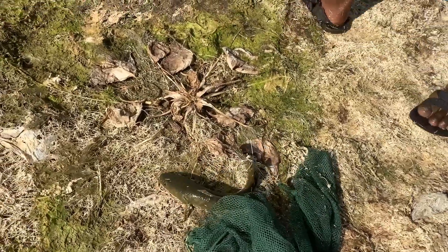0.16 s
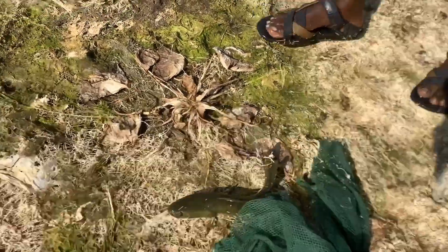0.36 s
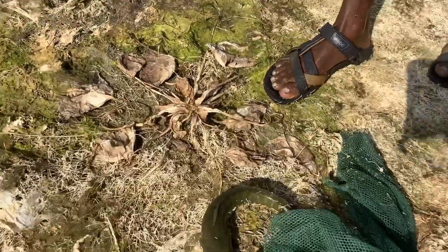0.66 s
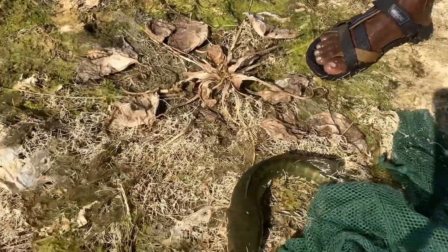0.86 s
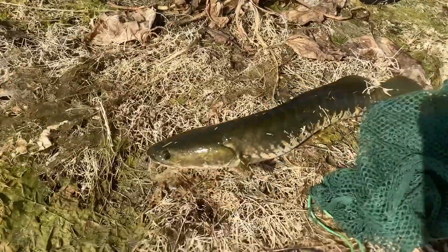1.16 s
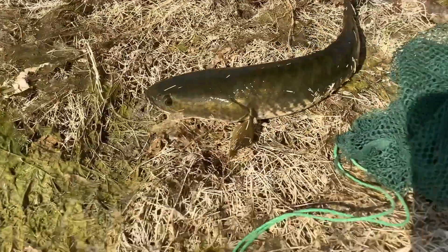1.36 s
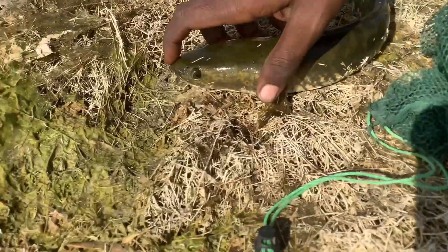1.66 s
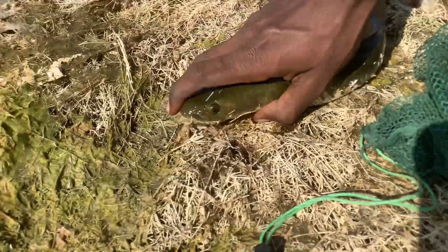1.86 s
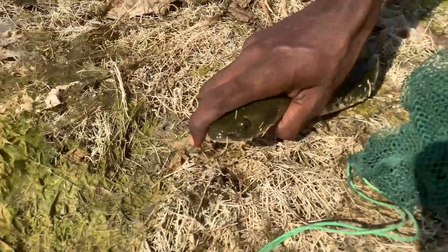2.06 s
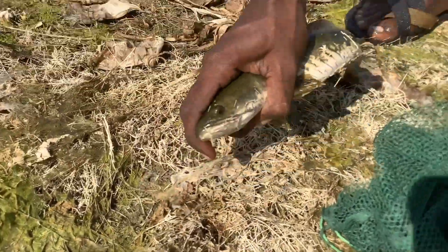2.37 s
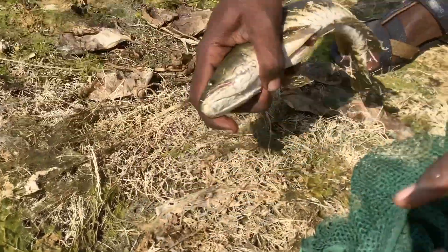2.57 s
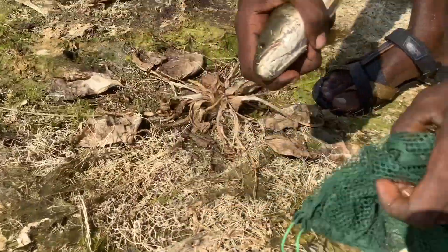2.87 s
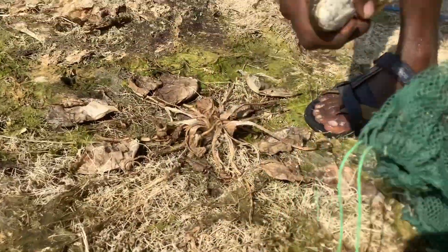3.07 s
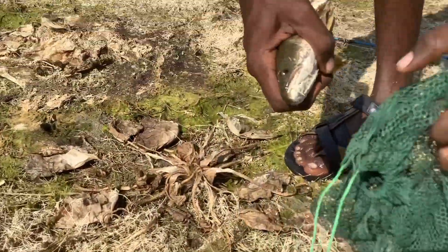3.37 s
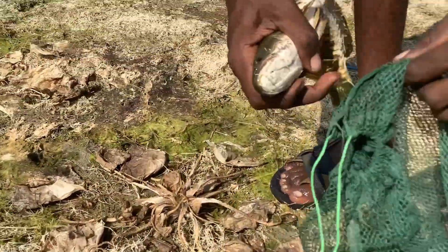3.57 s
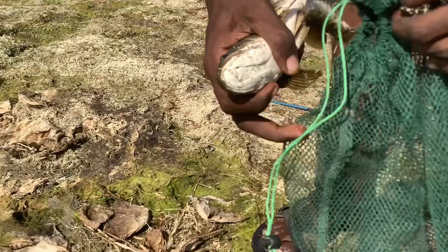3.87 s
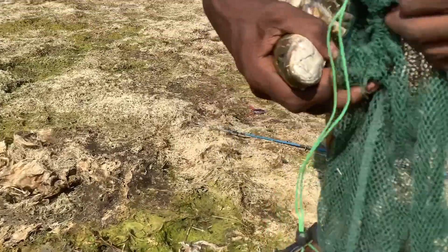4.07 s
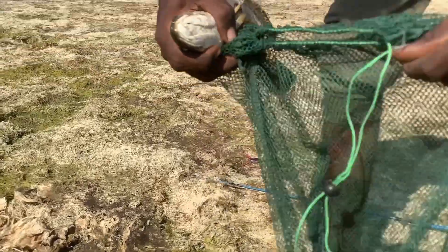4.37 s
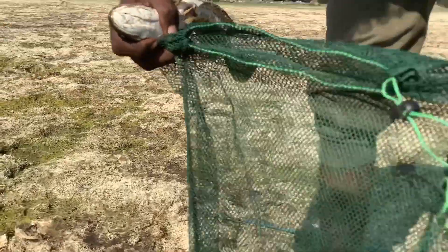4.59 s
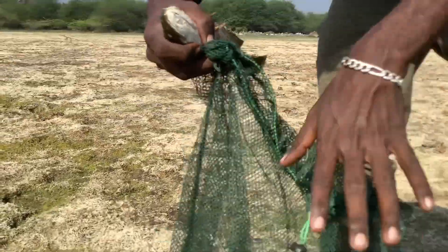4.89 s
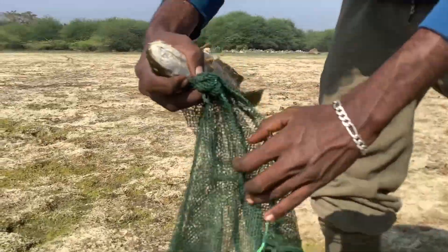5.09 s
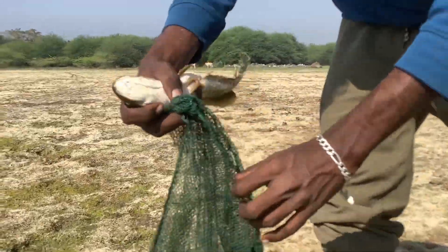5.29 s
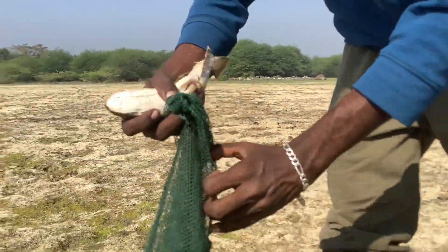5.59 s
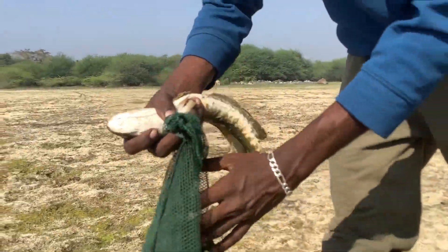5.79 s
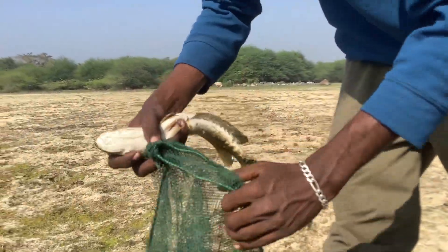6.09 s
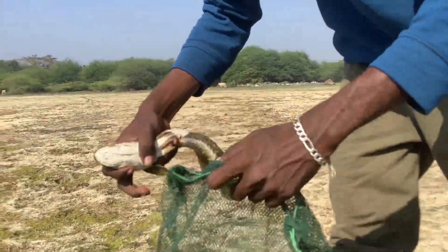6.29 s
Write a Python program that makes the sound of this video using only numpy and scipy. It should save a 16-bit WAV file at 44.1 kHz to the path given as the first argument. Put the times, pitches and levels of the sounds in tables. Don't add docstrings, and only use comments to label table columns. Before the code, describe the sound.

Close wet slaps and low thumps give way to brittle straw crunches, faint bird whistles and dry mesh scrapes, with a distant cricket and light wind.

```python
import sys
import numpy as np
from scipy import signal
from scipy.fft import rfft, irfft, next_fast_len
from scipy.io import wavfile
from scipy.ndimage import uniform_filter1d, map_coordinates

SR = 44100
rng = np.random.default_rng(int(sys.argv[2]) if len(sys.argv) > 2 else 0)


def wav_record(signal):
    frames = np.transpose(np.atleast_2d(signal))
    bounded = np.clip(frames, -1, 1)
    quanta = np.round(bounded * 32767).astype(np.int16)
    wavfile.write(sys.argv[1], SR, quanta)


def voltage_ratio(decibels):
    exponent = np.asarray(decibels, float) / 20
    return 10 ** exponent


N = 284268


def unit(x):
    return x / np.sqrt(np.mean(x ** 2) + 1e-20)


def curves(rows, edge_s=None):
    knots_s, *columns = np.transpose(rows)
    t = np.arange(N) / SR
    fall_db = 0
    if edge_s is not None:
        fall_db = -60 * np.maximum(0, np.maximum(knots_s[0] - t, t - knots_s[-1])) / edge_s
    return [np.interp(t, knots_s, column) for column in columns], fall_db


def wobble(knots_per_s):
    knots = rng.standard_normal(int(N * knots_per_s / SR) + 4)
    return map_coordinates(knots, [np.arange(N) * knots_per_s / SR])


def filtered(x, response):
    size = next_fast_len(N + SR // 4)
    return irfft(rfft(x, size) * response(np.fft.rfftfreq(size, 1 / SR)), size)[..., :N]


def coloured(x, spectrum):
    knots_hz, knots_db = np.transpose(spectrum)
    return unit(filtered(x, lambda hz: voltage_ratio(np.interp(np.log(hz + 1), np.log(knots_hz), knots_db))))


def patchy(x, depth_db):
    z = signal.stft(x, nperseg=256)[2]
    gain = uniform_filter1d(rng.standard_normal(z.shape), size=14, axis=0)
    gain = uniform_filter1d(gain, size=4, axis=1)
    return unit(signal.istft(z * voltage_ratio(depth_db * unit(gain)), nperseg=256)[1][:N])


def crackle(breaks_per_s, spread_db, smooth):
    size_db = spread_db * np.minimum(rng.exponential(size=N), 4)
    breaks = (rng.random(N) < breaks_per_s / SR) * voltage_ratio(size_db) * rng.standard_normal(N)
    return unit(breaks) + smooth * rng.standard_normal(N)


def add(x, start_s, sound):
    part = x[max(round(start_s * SR), 0):][:len(sound)]
    part += sound[:len(part)]


def ring(hz, t60_s, rise_s=.0001):
    t = np.arange(SR // 10) / SR
    return voltage_ratio(-60 * t / max(t60_s, .001)) * (1 - np.exp(-t / rise_s)) * np.sin(2 * np.pi * hz * t)


# start in seconds, crack in dB, thump in dB, knock in dB, thump in Hz.
SLAPS = [(0.3016, -55.5, -26.5, -54, 372), (0.331, -26, -20, -33, 218), (0.419, -3, -12, -15, 430),
         (0.4282, -14.5, -13.5, -32.5, 203.4), (0.4294, -17.5, -24, -35, 326), (1.276, -47, -49, -38, 211),
         (1.386, -30, -52.5, -31.5, 200), (3.686, -22.5, -46.5, -50.5, 370), (3.7132, -32, -32, -35.5, 331),
         (3.871, -19, -38.5, -30.5, 480), (3.8831, -9.5, -20, -24, 425), (3.8856, -22.5, -26, -36, 496),
         (3.962, -31, -33, -36.5, 348), (4.834, -38, -30.5, -41, 323), (5.012, -25, -25.5, -20.5, 258),
         (5.1454, -50, -34, -47, 264), (5.162, -37, -29.5, -42, 242), (5.5447, -41.5, -35, -40.5, 353),
         (5.9, -39.5, -31, -36, 350), (6.1695, -43, -35, -40.5, 193), (.531, -65, -40.5, -62, 249),
         (0.544, -65, -39.5, -58, 250), (.352, -50, -23.5, -40, 305), (.394, -56, -33, -48, 477),
         (0.318, -55, -30, -50, 420)]


def slaps():
    out, cracks = np.zeros(N), np.zeros(N)
    t = np.arange(SR // 10) / SR
    spray = (voltage_ratio(-60 * t / .005) + .07 * voltage_ratio(-60 * t / .02)) * (1 - np.exp(-t / .0005))
    for s, crack_db, thump_db, knock_db, hz in SLAPS:
        burst = spray * rng.standard_normal(len(t))
        burst /= np.linalg.norm(burst)
        add(cracks, s, voltage_ratio(crack_db) * burst)
        add(cracks, s - .002, voltage_ratio(crack_db - 16) * burst[:SR // 500][::-1])
        crack_hz = 6300 + 75 * crack_db
        add(out, s + .0006, voltage_ratio(crack_db + 6) * ring(crack_hz, .0022))
        thump = ring(hz, .03, rise_s=.001) + 1.25 * ring(hz * 1.41, .013) + .22 * ring(hz * 2.2, .019)
        add(out, s, voltage_ratio(thump_db + 2) * thump)
        knock = ring(hz * 3.18, .007) + ring(1117, .0062) + .47 * ring(1935, .0065)
        add(out, s, voltage_ratio(knock_db + 3.5) * knock)

    def skin(hz):
        resonance = 1j * hz * 7000 / (5500 ** 2 - hz * hz + 1j * hz * 7000)
        return resonance / (1 + 1j * hz / 9000) ** 2
    return out + voltage_ratio(15) * filtered(cracks, skin)


# start in seconds, length in seconds, hiss in dB,
# drag over hiss in dB, swell from start to end in dB.
STRAW_DRAGS = [(0, 0.071, -68, 13, 1), (0.123, 0.022, -57, 9.5, -10), (3.273, 0.015, -65, -17, 4),
               (4.624, 0.075, -65.5, -17, 6), (0.233, 0.059, -56.5, 9.5, 5),
               (0.303, 0.076, -45.5, 16, -0.5), (0.396, 0.032, -47, 21, 2), (0.861, 0.0087, -51, 1, 2),
               (1.323, 0.097, -53, -7.5, -7), (1.419, 0.11, -57.5, -3.5, -3.5),
               (1.916, 0.018, -56.5, -21, 7), (2.546, 0.054, -59.5, -5, -1), (2.725, 0.023, -57, -23, -0.5),
               (2.96, 0.049, -57.5, -6, -7), (4.725, 0.12, -54.5, -20, 1), (4.86, 0.05, -58, -23, 9),
               (6.192, 0.096, -63, 5.5, 2), (6.348, 0.032, -55, -3, 4), (6.39, 0.065, -57.5, -4.5, 5),
               (0.707, 0.11, -58, 3.5, -2)]
MESH_DRAGS = [(0.55, 0.02, -46.5, -14, 10.5), (0.577, 0.021, -49.5, -5.5, -4),
              (0.626, 0.062, -55.5, -3.5, 1), (5.014, 0.035, -41.5, -1.5, -5.5),
              (5.196, 0.023, -53.5, 4.5, -2), (5.36, 0.031, -46.5, -3, -1.5),
              (5.407, 0.027, -51.5, -1.5, 12), (5.446, 0.048, -38, 0, 4.5), (5.495, 0.019, -32.5, 4, 7.5)]
# frequency in Hz, level in dB per Hz.
STRAW = [(880, -28), (1500, -3.5), (1920, -7), (2320, -8), (3520, -2.5), (5440, 0.5), (6500, -4.5),
         (10800, -5), (16000, -18.5)]
MESH = [(880, -42), (1500, -18), (2460, -2), (3030, -7.5), (3480, -0.5), (6240, -4), (7240, -3.5),
        (14500, -21.5), (16000, -30.5)]
BODY = [(130, -3), (200, 2.5), (330, 0.5), (480, -1), (700, -7), (1100, -8.5), (2000, -13), (3300, -22),
        (5000, -28.5)]
MESH_BODY = [(130, -17.5), (200, 0.5), (260, -11.5), (330, -2), (480, -2), (1100, -9.5), (2000, -12.5),
             (5000, -41)]


def scrapes():
    catches = wobble(70)
    straw = coloured(crackle(1500, spread_db=1, smooth=1), STRAW)
    straw = patchy(voltage_ratio(1.9 * catches) * straw, depth_db=2.5)
    mesh = coloured(crackle(4000, spread_db=2.2, smooth=1.2), MESH)
    mesh = unit(voltage_ratio(1.5 * catches) * mesh)
    grains = crackle(900, spread_db=2.5, smooth=1.3)
    drags = [unit(voltage_ratio(1.5 * catches) * coloured(grains, body)) for body in (BODY, MESH_BODY)]
    out = np.zeros(N)
    for hiss, drag, strokes in zip((straw, mesh), drags, (STRAW_DRAGS, MESH_DRAGS)):
        for s, length_s, db, drag_db, swell_db in strokes:
            ends = [(s, db - swell_db / 2), (s + length_s, db + swell_db / 2)]
            (press_db,), fall_db = curves(ends, edge_s=.029)
            out += voltage_ratio(press_db + fall_db) * (hiss + voltage_ratio(drag_db - 2.5) * drag)
    return out


# time in seconds, level in dB.
RUSTLE = [(0, -59), (.13, -50.5), (.2, -54.5), (.45, -51.5), (.79, -52.5), (.95, -53), (1.17, -52.5),
          (1.49, -64), (1.75, -57), (2.2, -63), (2.45, -58), (2.65, -62), (3.07, -60.5), (3.3, -65.5),
          (3.72, -60.5), (4.16, -63), (5.4, -58.5), (5.7, -64)]


def rustle():
    (straw_db,), _ = curves(RUSTLE)
    stem_db = .88 * straw_db - 6.5
    clumps = wobble(30)
    stalks = coloured(crackle(400, spread_db=2.2, smooth=2.2), STRAW)
    stalks = voltage_ratio(1.8 * clumps) * patchy(stalks, depth_db=2.2)
    stems = coloured(crackle(300, spread_db=2.2, smooth=2.2), BODY)
    return voltage_ratio(straw_db - 6.5) * stalks + voltage_ratio(stem_db - 6 + 2.9 * clumps) * stems


# start in seconds, peak in dB, pitch in Hz.
TICKS = [(0.2316, -32.5, 3940), (0.3665, -21.5, 4930), (0.5115, -28.5, 4840), (0.8583, -31, 8310),
         (0.867, -34, 7760), (0.9428, -30.5, 4700), (0.9584, -30, 3640), (1.0944, -48, 7920),
         (1.4535, -32, 4830), (2.5105, -36.5, 5320), (2.7369, -35, 5020), (2.844, -37, 5440),
         (2.8786, -28, 5570), (2.879, -26.5, 10200), (2.9637, -34.5, 4530), (2.9878, -30, 3810),
         (3.209, -44.5, 7130), (3.2288, -39, 4830), (3.8454, -42, 5330), (4.88, -33, 8200),
         (4.8965, -29, 8700), (5.1926, -29, 5670), (5.215, -34, 5260), (5.3317, -32.5, 5860),
         (6.2245, -34.5, 5800)]
# start in seconds, peak in dB.
KNOCKS = [(.235, -35), (.78, -41), (.273, -47), (1.04, -44), (1.051, -51), (1.059, -42), (2.876, -46),
          (2.987, -44.5), (1.355, -39), (2.197, -42.5), (2.561, -43), (2.743, -43.5), (3.04, -37),
          (5.196, -47)]
# start in seconds, first gap in seconds, next gap over it (ratio),
# peak in dB, change in dB a stem.
RATCHETS = [(.805, .0222, .945, -32, .1), (.947, .0146, .89, -30.5, -1.6)]


def snaps():
    out = np.zeros(N)
    (stir_db,), _ = curves(RUSTLE)
    chance = rng.random((round(12 * N / SR), 3))
    strays = [(u * N / SR, stir_db[int(u * N)] + 5 + 8 * v, 3000 * 5.1 ** w) for u, v, w in chance]
    for s, db, hz in TICKS + strays:
        tick = ring(hz, .0022, rise_s=.00013) + .39 * ring(hz * .673, .0015, rise_s=.00013)
        tick += 1.3 * ring(min(hz * 1.5, 14000), .001, rise_s=.00017)
        add(out, s, voltage_ratio(db + 4.5) * tick)
    runs = []
    for (s, gap_s, shrink, db, step_db), stems in zip(RATCHETS, (6, 9)):
        for k in range(stems):
            runs.append((s + gap_s * (1 - shrink ** k) / (1 - shrink), db + k * step_db))
    for s, db in KNOCKS + runs:
        level = voltage_ratio(db + rng.normal(0, 2))
        knock = ring(rng.uniform(720, 1000), .006) + .2 * ring(520, .007)
        knock += .8 * ring(rng.uniform(1300, 2000), .0025) + .5 * ring(2800, .002)
        add(out, s, level * knock)
    return out


# start in seconds, peak in dB, pitch
# in Hz.
STALKS = [(1.3286, -26, 9800), (1.3302, -36, 5200), (1.3787, -31, 8800), (1.455, -33, 4360),
          (1.476, -29.5, 10680), (1.5313, -55, 4540), (1.5322, -34.5, 4310),
          (4.6208, -50, 8400), (4.6303, -51, 4470), (4.6612, -43, 5200), (4.725, -53, 4680),
        (4.751, -31, 9640), (4.7934, -37, 5000), (4.8248, -41, 7820), (4.8323, -38, 4600),
        (4.8792, -39, 8540), (4.8957, -30.5, 9040),
          (0.6457, -36, 5030), (3.5663, -50, 5000), (5.5788, -44, 4600), (5.5905, -42, 4350),
         (5.625, -46, 7700), (6.3173, -41.5, 7600), (6.333, -43, 7740), (6.3594, -44, 7600),
         (6.3744, -48, 7250), (6.4056, -36, 11000)]


def crush():
    out, t = np.zeros(N), np.arange(SR // 100) / SR
    for s, db, hz in STALKS:
        puff = unit(uniform_filter1d(rng.standard_normal(len(t)), size=5))
        envelope = voltage_ratio(db - .5 - 60 * t / .011) * (1 - np.exp(-t / .0006))
        add(out, s, envelope * puff * np.sin(2 * np.pi * hz * t))
    return out


def whistle(start_s, end_s, first_hz, middle_hz, last_hz, db, waver=.0146):
    u = np.linspace(0, 1, max(round((end_s - start_s) * SR), 9))
    hz = np.polyval(np.polyfit([0, .5, 1], [first_hz, middle_hz, last_hz], 2), u)
    hz = hz * (1 + waver * wobble(67)[:len(u)])
    swell = np.sin(np.pi * u) ** .3
    return voltage_ratio(db + 3.5) * swell * np.sin(2 * np.pi * np.cumsum(hz) / SR)


# start in seconds, length in seconds; then one level in dB for each.
UPSLURS = [(3.935, .025), (4.635, .108), (4.955, .105), (5.25, .105), (5.582, .1), (5.908, .1),
           (6.25, .085)]
UPSLUR_DB = [-70, -64, -70, -70, -71, -72, -73]
# start in seconds, length in seconds, pitch in Hz, level in dB.
PIPES = [(0.126, .04, 7200, -65), (2.24, 0.095, 7350, -74.5), (4.159, 0.11, 7670, -71.5)]
# start in seconds, length in seconds, first Hz, last Hz, level in dB.
GLIDES = [(.1, .022, 6200, 7300, -73), (1.456, .16, 2710, 2510, -74.5), (1.807, .035, 1970, 1850, -68),
          (3.194, .04, 4280, 3190, -70.5), (3.311, .012, 2830, 2970, -72), (3.43, .028, 5400, 5140, -74),
          (4.9, .035, 5200, 4060, -68), (3.345, .02, 3900, 2660, -58), (3.45, .018, 4220, 4530, -69),
          (3.491, .02, 3820, 4440, -67), (3.49, .045, 3200, 2610, -69.5), (3.525, .014, 4400, 6000, -60.5),
          (4.06, .05, 3880, 2810, -67.5), (4.099, .024, 2610, 3020, -63), (4.134, .04, 4040, 3000, -72.5),
          (4.202, .034, 5770, 4700, -70), (4.475, .03, 3450, 3270, -67), (4.79, .036, 3700, 2970, -76),
          (5.165, .05, 4200, 3370, -66), (5.336, .056, 2600, 2200, -62), (5.55, .05, 2440, 2540, -65),
          (5.6, .138, 2554, 2500, -70), (5.765, .045, 5350, 4650, -77), (6.0, .068, 5430, 3400, -74.5),
          (5.86, .026, 5700, 4370, -66), (5.682, .025, 4550, 4700, -71), (6.008, .02, 4450, 4700, -67)]
# start in seconds, length in seconds, middle in Hz, height over the ends in Hz,
# level in dB.
ARCHES = [(3.398, .024, 5600, 698, -73.5), (3.323, 0.014, 3000, -600, -62),
          (5.81, 0.055, 4560, -350, -77.5), (3.537, 0.043, 4370, -480, -63.5),
          (3.572, 0.024, 5030, 419, -59.5), (3.595, .02, 4470, 204, -67), (3.892, 0.072, 5700, 329, -68),
          (4.013, 0.039, 3100, 349, -64.5), (4.078, 0.098, 7200, -520, -75.5),
          (4.52, 0.078, 4780, 293, -72), (4.526, 0.059, 4140, 209, -71), (4.576, 0.041, 2640, 198, -72),
          (5.65, 0.032, 5420, 701.5, -73), (5.694, 0.07, 5560, 451.5, -73),
          (5.785, 0.019, 5370, 201.5, -67.5), (5.925, 0.071, 5760, 602, -72)]
# start in seconds, length in seconds, pitch in Hz, level in dB.
CALLS = [(1.04, 0.25, 792, -69), (1.046, 0.25, 1610, -75), (1.648, 0.077, 678, -67), (1.7, 0.335, 726, -62),
         (2.034, 0.073, 670, -69), (3.27, 0.16, 1540, -74)]


def birds():
    out = np.zeros(N)

    def rise_hz(t):
        return 2750 + 13000 * t + 65000 * t * t

    def droop(t):
        return 2 ** (-36 * t * t)
    notes = [(s, s + d, rise_hz(0), rise_hz(d / 2), rise_hz(d), db)
             for (s, d), db in zip(UPSLURS, UPSLUR_DB)]
    notes += [(s, s + d, hz, hz * droop(d / 2), hz * droop(d), db) for s, d, hz, db in PIPES]
    notes += [(s, s + d, a, (a + b) / 2, b, db) for s, d, a, b, db in GLIDES]
    notes += [(s, s + d, hz - up, hz, hz - up, db) for s, d, hz, up, db in ARCHES]
    for u, v, w, z in rng.random((26, 4)):
        s, hz = 3.2 + u * (5.1 - 3.2), 2200 * 2.5 ** v
        notes.append((s, s + .03 + .05 * z, hz, hz * (.95 + .2 * w), hz * (.8 + .4 * z), -85 + 5 * w))
    for note in notes:
        add(out, note[0], whistle(*note, waver=.0091))
    sag = .915
    for s, length_s, a, db in CALLS:
        end_s, b, c = s + length_s, a * sag ** .218, a * sag
        add(out, s, whistle(s, end_s, a, b, c, db))
        add(out, s, whistle(s, end_s, a + 46, b + 46, c + 46, db - 2))
    t = np.arange(SR // 5) / SR
    trees = rng.standard_normal(len(t)) * voltage_ratio(-60 * t / .2)
    echoes = signal.fftconvolve(out, trees / np.linalg.norm(trees))[:N]
    return out * voltage_ratio(1.6 * wobble(45)) + voltage_ratio(-8) * echoes


# start in seconds, first chirp in dB, middle chirp in dB, last chirp in dB.
CHIRPS = [(.03, -65, -67, -70), (5.58, -70.5, -64.5, -64)]


def cricket():
    out = np.zeros(N)
    for (bout_s, *levels_db), count in zip(CHIRPS, (9, 7)):
        for chirp in range(count):
            s = bout_s + chirp * .118
            db = np.interp(chirp / (count - 1), [0, .5, 1], levels_db)
            for k in range(12):
                stroke = ring(7800 + rng.normal(0, 50), .016, rise_s=.0012)
                add(out, s + k * .0079, voltage_ratio(db + 11.5 + .54 * k + rng.normal(0, 2.1)) * stroke)
    return out


# time in seconds, level in dB.
WIND = [(0, -60), (.5, -46), (.95, -48.5), (2.3, -48), (2.85, -49.5), (3.4, -48), (4.1, -53.5),
        (4.7, -45.5), (5.0, -53), (5.45, -42), (5.65, -51.5), (6.45, -49.5)]
INSECTS = [(0.0, -71), (0.52, -98), (1.4, -70), (1.49, -71.5), (1.99, -90.5), (3.53, -69.5), (3.72, -70.5),
           (4.29, -70), (5.31, -61), (5.73, -67.5), (6.45, -62.5)]
# centre in
# seconds, half width in seconds, peak in dB.
PUFFS = [(0, 0.027, -46), (0.142, 0.014, -45), (0.249, 0.016, -37), (.36, 0.041, -33.5), (.54, 0.02, -46),
         (.83, 0.023, -35), (2.33, 0.069, -65.5), (2.93, 0.011, -46), (3.43, 0.03, -43),
         (3.658, 0.016, -43.5), (3.9, 0.036, -41.5), (4.169, 0.045, -42.5), (5.03, 0.026, -42.5),
         (5.18, 0.059, -51.5), (6.0, 0.023, -35)]
# frequency in Hz, level in dB per Hz.
RUMBLE = [(18, -48), (30, -8.5), (65, -3.5), (110, -8), (140, -16.5), (240, -120)]
BUFFET = [(80, -47), (120, -2.5), (165, 3), (220, -10), (330, -11.5), (600, -51)]
AIR = [(130, -32), (220, -0.5), (245, -18), (451, -1), (612, 1), (745, -8), (1300, -25.5), (2570, -11.5),
       (4090, -24), (5360, -20), (6410, -46), (8540, -19.5), (12000, -60), (16000, -39)]


def field():
    (breeze_db,), _ = curves(WIND)
    (chorus_db,), _ = curves(INSECTS)
    t = np.arange(N) / SR
    puffs = sum(voltage_ratio(db) * np.exp(-((t - s) / width_s) ** 2) for s, width_s, db in PUFFS)
    rumble_db = 20 * np.log10(voltage_ratio(breeze_db) + puffs)
    deep = voltage_ratio(3.04 * wobble(14)) * coloured(rng.standard_normal(N), RUMBLE)
    upper = voltage_ratio(.5 + .56 * wobble(30)) * coloured(rng.standard_normal(N), BUFFET)
    gusts = voltage_ratio(rumble_db - 5) * deep + voltage_ratio(.59 * rumble_db - 27.5) * upper
    chorus = coloured(rng.standard_normal(N), [(7000, -18), (8200, 0), (8750, 2.5), (9300, -4.5),
                                               (9700, -7), (10300, -23), (11000, -27)])
    air = voltage_ratio(-67.5 + .62 * wobble(2.1)) * coloured(rng.standard_normal(N), AIR)
    return gusts + air + voltage_ratio(chorus_db - 4.5) * chorus


def scene():
    near = slaps() + scrapes() + rustle() + snaps() + crush()
    return (near + birds() + cricket() + field())[None]


def top_cut(x):
    return signal.sosfilt(signal.butter(12, 16630, fs=SR, output="sos"), x)


def record(dry):
    def phone(hz):
        sweep = np.exp(-2j * np.pi * 1.97 * np.log(1 + hz / 150))
        band = (hz < 16100) / (1 + (55 / (hz + 1)) ** 4)
        port = voltage_ratio(-3 * np.exp(-((hz - 6800) / 400) ** 2))
        return sweep * band * port
    return top_cut(filtered(dry, phone))


dry = scene()
out = record(dry)
wav_record(out)
```